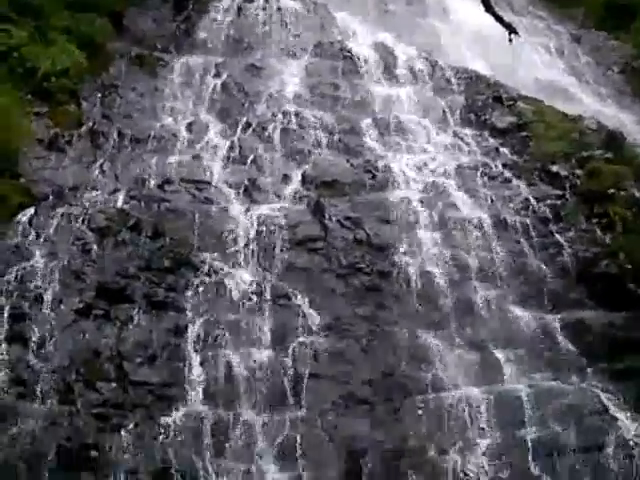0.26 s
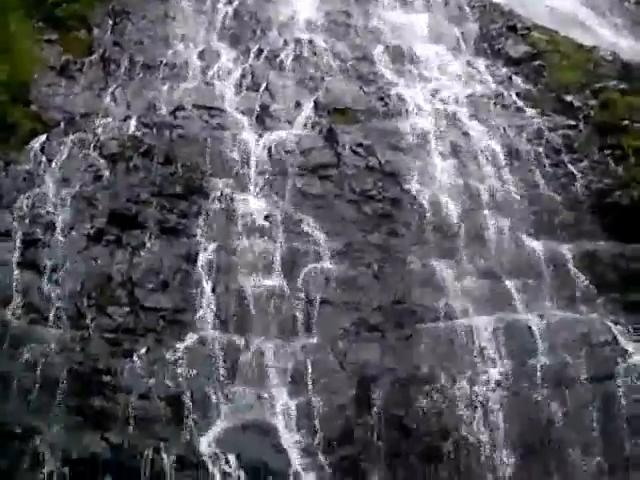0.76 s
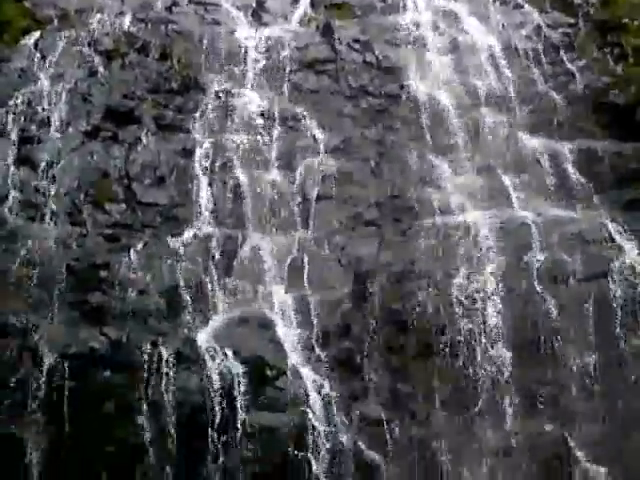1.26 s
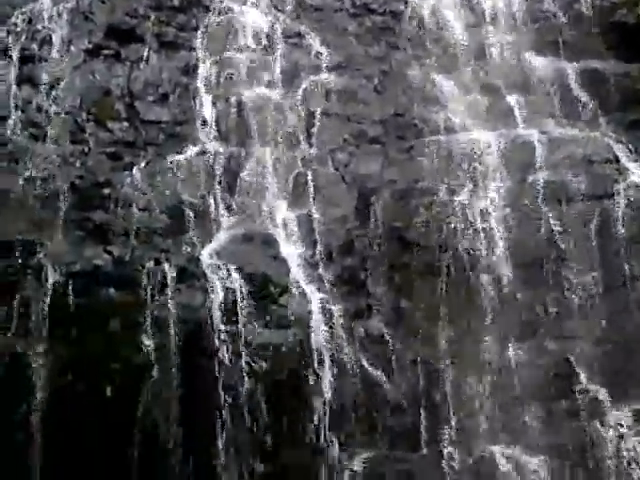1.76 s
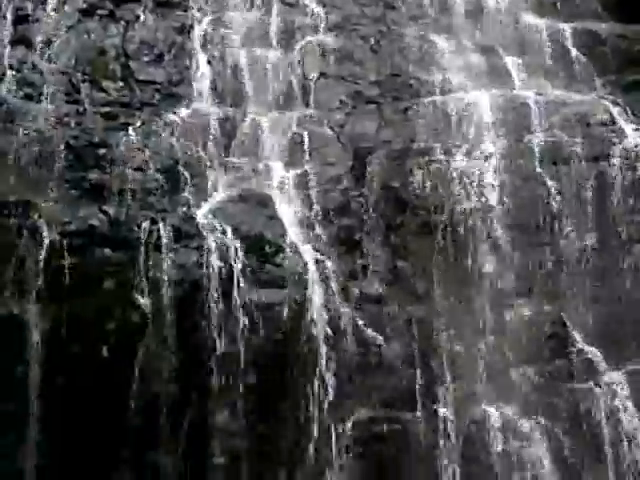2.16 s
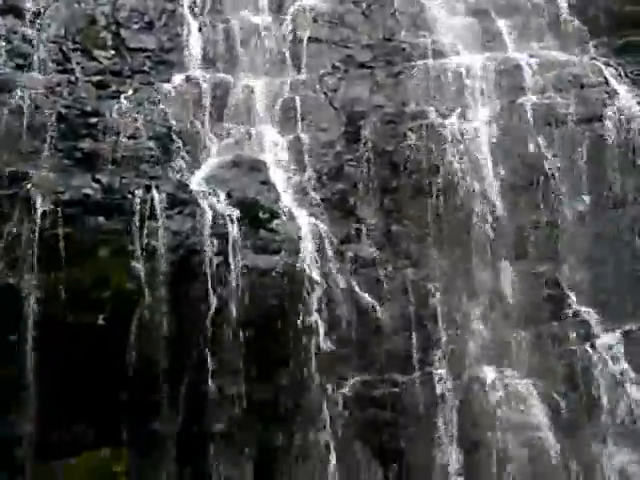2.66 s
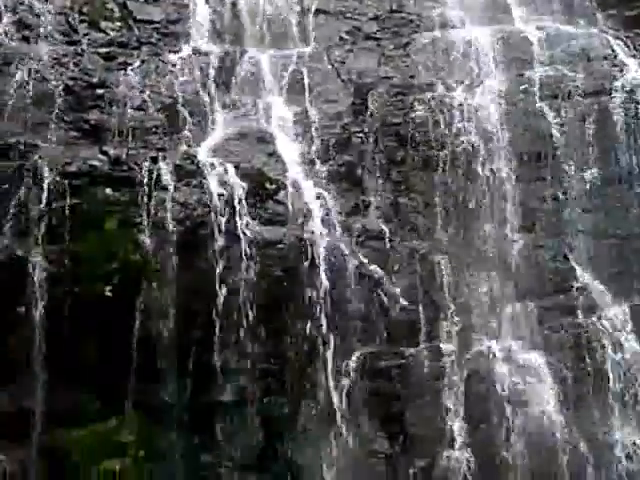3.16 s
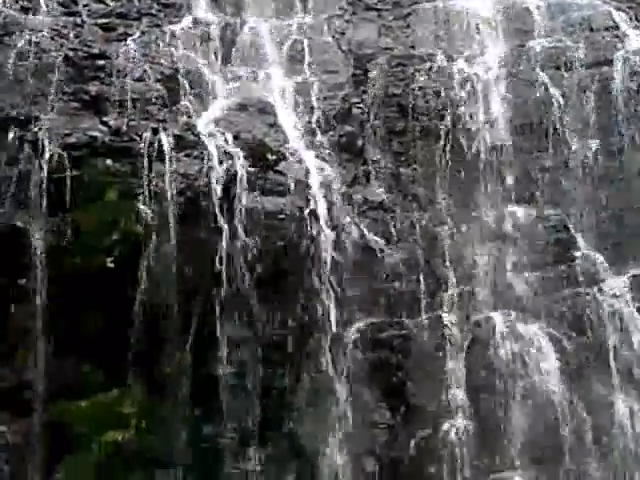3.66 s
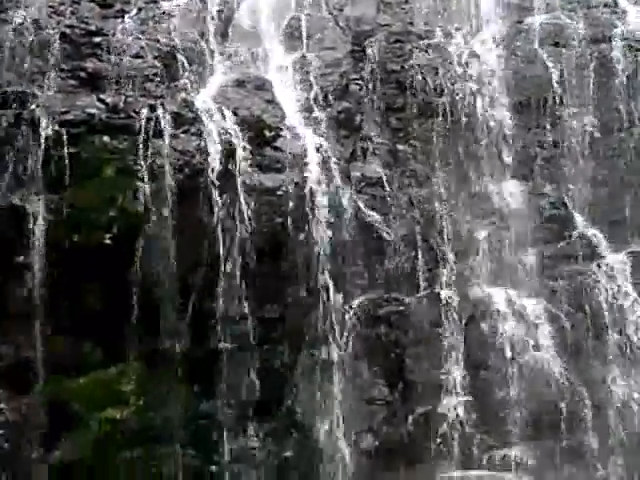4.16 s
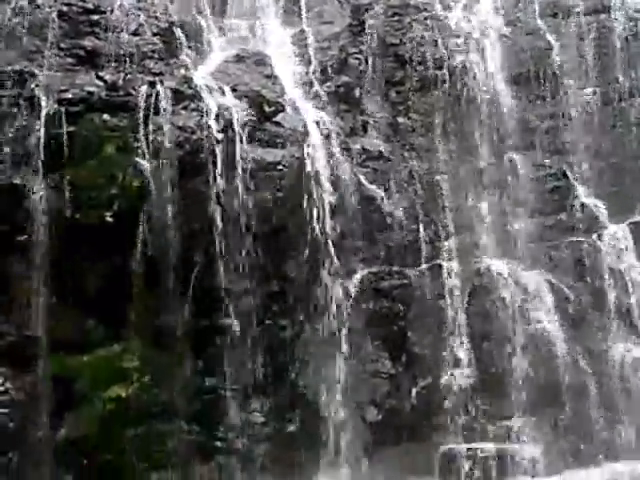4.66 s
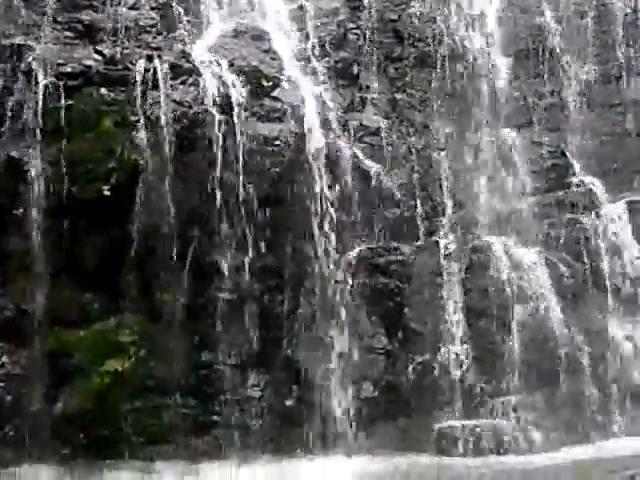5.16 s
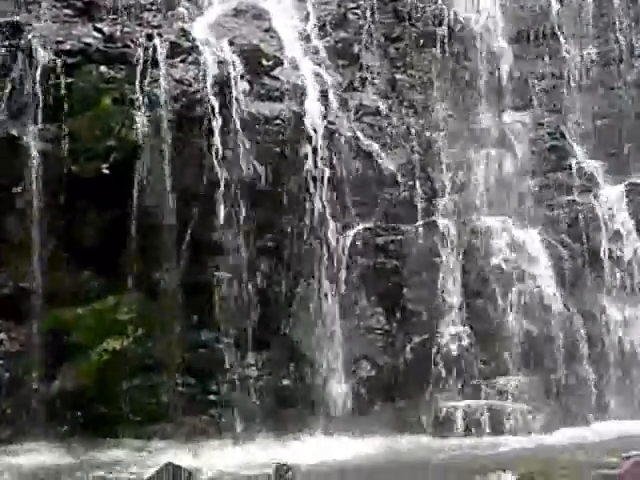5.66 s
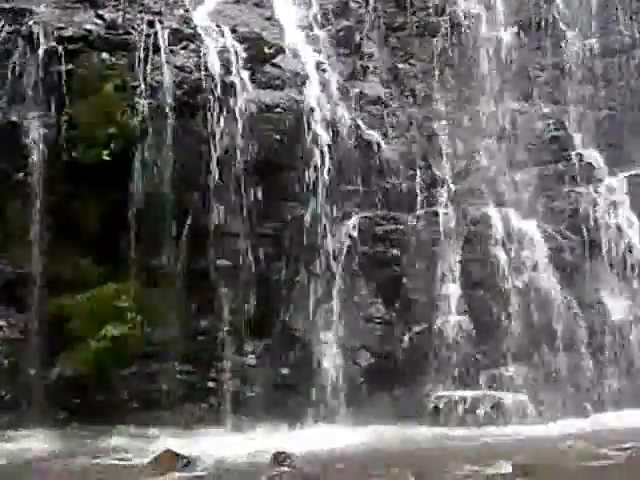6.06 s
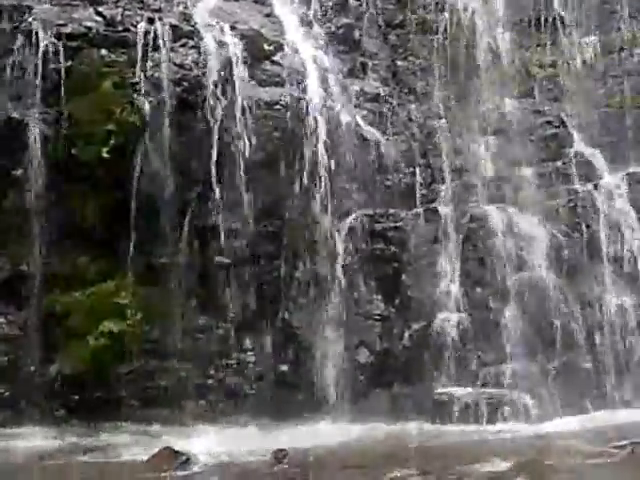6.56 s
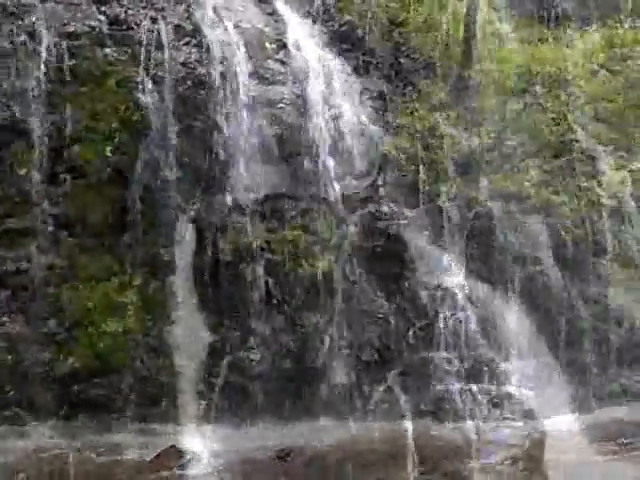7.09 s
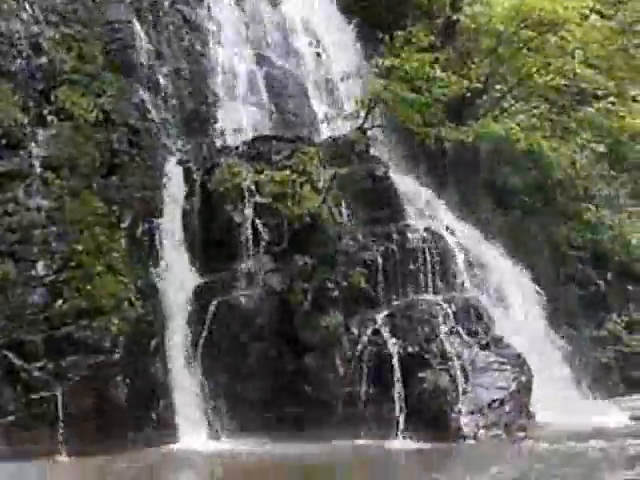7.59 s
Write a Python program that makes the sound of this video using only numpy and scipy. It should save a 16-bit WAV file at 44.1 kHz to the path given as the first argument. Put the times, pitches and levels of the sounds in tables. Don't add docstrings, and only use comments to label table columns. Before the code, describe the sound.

Constant dense roar of falling water with bright spray hiss and a fluttering low churn, thin in bass, heard from the left.

```python
import sys
import numpy as np
from scipy import signal
from scipy.fft import rfft, irfft, dct, next_fast_len
from scipy.io import wavfile
from scipy.ndimage import uniform_filter1d, minimum_filter1d, map_coordinates

SR = 44100
rng = np.random.default_rng(int(sys.argv[2]) if len(sys.argv) > 2 else 0)


def wav_out(sig):
    wavfile.write(sys.argv[1], SR, np.round(np.clip(np.atleast_2d(sig).T, -1, 1) * 32767).astype(np.int16))


def natural_amplitude(level_db):
    exponent = np.asarray(level_db, float) / 20
    return 10 ** exponent


N = 345303

# pitch_hz, level_db
RUSH_COLOUR = [(150, -13), (280, -7), (400, -4.5), (600, -4.5), (1090, -4.5), (1500, -6), (2890, -5.5),
               (4970, -3), (5700, -0.5), (6250, 1), (6750, -3.5), (7600, -3), (8200, -8.5), (9000, -40.5)]
# pitch_hz, level_db
SPRAY_COLOUR = [(6000, -40.5), (7600, -16.5), (8200, -0.5), (8800, 3.5), (9500, 1), (10600, 1), (11500, -5)]
# start_s (the middle), depth_db, length_s
POOL_LULLS = [(.26, 5, .08), (.94, 3.5, .08), (1.833, 7, .08), (2.212, 7, .09), (2.715, 9, .06),
              (2.993, 20, .09), (3.208, 9.5, .1), (3.337, 8, .07), (3.53, 4, .08), (3.82, 2.5, .13),
              (4.014, 5, .06), (4.26, 12, .11), (4.44, 5.5, .06), (4.66, 12.5, .08), (4.945, 8, .06),
              (5.06, 11, .07), (5.309, 6, .08), (5.41, 5, .05), (5.55, 7, .07), (7.097, 9, .1),
              (7.26, 6, .06), (7.403, 6.5, .05), (7.517, 20, .11), (7.662, 9, .06)]
# start_s, level_db, pitch_hz
BASS_BLIPS = [(0.031, -45, 273), (0.391, -43, 273), (0.554, -39, 172), (0.595, -38, 174),
              (0.752, -41.5, 215), (0.895, -40.5, 171), (1.17, -40, 170), (1.221, -39, 175),
              (2.008, -42, 210), (2.093, -44, 103), (2.096, -41, 150), (2.096, -47, 60), (2.097, -47, 82),
              (0.597, -57, 60), (2.181, -39.5, 214), (2.695, -42, 170), (2.999, -39, 179),
              (3.054, -34.5, 153), (3.199, -45, 274), (3.654, -40.5, 211), (4.067, -41.5, 171),
              (4.135, -42, 133), (4.435, -43, 171), (4.772, -42.5, 170), (5.385, -43.5, 208),
              (5.411, -44, 206), (5.846, -39.5, 212), (6.275, -40, 173), (6.472, -39, 136),
              (6.836, -43, 173), (7.085, -44.5, 178), (7.164, -45, 216), (7.311, -51, 213),
              (7.337, -49, 209), (7.735, -51, 212)]
# start_s, level_db
EDGE_BLIPS = [(0.325, -40), (1.199, -41), (1.415, -41.5), (1.631, -42.5), (1.699, -56), (2.201, -42),
              (3.417, -42), (3.682, -50), (3.76, -38.5), (4.383, -41.5), (5.483, -40), (5.797, -42.5),
              (5.965, -39), (6.002, -37), (6.042, -42), (6.108, -41), (6.243, -44), (6.446, -38.5),
              (6.657, -42), (7.207, -44), (7.506, -57)]
# start_s, level_db
HEM_BLIPS = [(0.196, -38.5), (0.258, -36.5), (0.34, -34), (0.402, -43), (0.508, -40), (0.567, -37),
             (0.65, -40.5), (0.675, -42), (0.762, -48), (0.949, -37), (1.08, -38), (1.148, -43),
             (1.196, -35), (1.414, -46), (1.551, -38.5), (1.629, -37), (1.708, -35), (1.923, -57),
             (2.031, -46), (2.089, -50), (2.189, -38), (2.293, -40), (2.489, -42), (2.611, -40),
             (2.735, -53), (2.793, -41), (2.828, -39), (3.073, -38), (3.209, -38), (3.462, -43),
             (3.594, -45), (3.683, -42), (3.708, -43), (3.923, -40), (4.08, -50), (4.671, -40.5),
             (4.711, -41), (5.103, -39), (5.199, -44), (5.326, -38), (5.426, -41), (5.467, -39),
             (5.51, -39), (5.613, -42), (5.714, -38), (5.772, -44), (5.802, -38), (5.859, -38),
             (6.051, -36), (6.165, -37), (6.23, -36), (6.416, -37), (6.579, -36), (6.761, -48),
             (6.865, -42), (6.968, -37), (7.201, -50), (7.39, -38), (7.595, -47), (7.69, -44)]
# start_s, length_s, level_db
NOTCH_LEAKS = [
    (.59, .04, -50),
    (2.08, .05, -53),
    (2.6, .08, -56),
    (2.83, .14, -51),
    (4.52, .06, -57),
    (5.98, .05, -55),
    (6.98, .09, -50),
    (7.68, .1, -56),
]
# pitch_hz, level_db
MICROPHONE = [(7000, 0), (7550, -1.5), (7740, -7), (7805, -32), (7895, -32), (7965, -7), (8200, -1),
              (8600, 0), (10950, 0), (11130, -6), (11170, -90)]
# start_s, level_db
LEVEL_RIDE = [
    (0.0, -22),
    (0.11, -23),
    (0.15, -21.5),
    (1.46, -22),
    (6.3, -22),
    (7.83, -21.5),
]
# pitch_hz, level_db
FAR_VIEW = [(350, -3.5), (600, -2), (1200, -2.5), (2500, -1), (5000, -0.8), (11000, -0.2)]
# pitch_hz, share
LEFT_IN_RIGHT = [(150, .4), (300, .64), (600, .64), (1200, .58), (3000, .43), (7000, .3), (11000, .12)]
# pitch_hz, level_db
RIGHT_LEVEL = [(80, -37), (170, -24.5), (300, -30.5), (2000, -28.5), (6000, -30), (7590, -29.5),
               (7660, -60), (7960, -60), (8030, -29), (11000, -28.5)]
# pitch_hz, step_db
SHORT_STEPS = [(200, -7.3), (1000, -6.4), (3000, -6.5), (6000, -6.8), (11000, -7)]
# pitch_hz, step_db
LONG_STEPS = [(60, -35), (240, -30), (450, -18.5), (2000, -14.5), (7000, -15.5), (9000, -9)]
# pitch_hz, step_db
LEFT_STEPS = [(60, -56), (200, -57), (350, -39.5), (1000, -30), (2500, -26), (6000, -29.5), (7500, -22.5),
              (7750, -48), (7950, -38), (8200, -32), (11000, -27.5), (11200, -50)]
# pitch_hz, step_db
RIGHT_STEPS = [(30, -58), (150, -54), (300, -45), (1000, -41), (3000, -37), (6000, -33), (7400, -36),
               (9000, -30), (11000, -31)]
# start_s (the middle), pitch_hz, depth_db
STARVED_BANDS = [(0.0, 3574, 13), (0.01, 3100, 10), (0.31, 2520, 9), (0.6, 2368, 10), (0.87, 3919, 9),
                 (0.91, 1920, 10), (1.03, 2067, 11), (1.21, 1400, 8), (1.47, 1421, 23), (1.54, 2240, 10),
                 (1.82, 904, 15), (1.87, 2583, 12), (1.95, 3270, 11), (2.1, 2260, 14), (2.1, 3488, 14),
                 (2.73, 2713, 10), (2.91, 3170, 10), (3.05, 1490, 12), (3.07, 2540, 11), (3.19, 3789, 11),
                 (3.29, 1960, 11), (3.49, 970, 10), (3.72, 3040, 13), (4.02, 2220, 10), (4.42, 2750, 10),
                 (4.45, 615, 12), (4.64, 2497, 17), (4.75, 1808, 7), (4.81, 2799, 15), (4.89, 3617, 12),
                 (5.39, 2153, 9), (5.49, 1765, 10), (5.56, 1981, 12), (5.9, 2080, 14), (6.08, 1937, 10),
                 (6.45, 1550, 10), (6.47, 4177, 8), (6.77, 2600, 12), (6.83, 2050, 10), (7.54, 1130, 10)]

BLIP_S = 0.029


def unit(x):
    return x / np.sqrt(np.mean(x ** 2) + 1e-20)


def along(points, hz):
    f, v = np.transpose(points)
    return np.interp(np.log(hz + 1), np.log(f + 1), v)


def wobble(rate):
    knots = rng.standard_normal(int(N * rate / SR) + 4)
    return map_coordinates(knots, [np.arange(N) * rate / SR])


def filtered(x, response):
    m = next_fast_len(N + 8192)
    hz = np.fft.rfftfreq(m, 1 / SR)
    return irfft(rfft(x, m) * response(hz), m)[..., :N]


def splashes(colour, patchy_db, drop_db, drops):
    z = signal.stft(rng.standard_normal((2, N)), nperseg=512)[2]
    patches = uniform_filter1d(rng.standard_normal(z.shape), 4, axis=1)
    patches = unit(uniform_filter1d(patches, 8, axis=2))
    bed = unit(signal.istft(z * natural_amplitude(patchy_db * patches), nperseg=512)[1][:, :N])
    strikes = (rng.random((2, N)) < drops / SR) * rng.standard_normal((2, N))
    mixed = bed + natural_amplitude(drop_db) * unit(strikes)
    return unit(filtered(mixed, lambda hz: natural_amplitude(along(colour, hz))))


def lulls():
    t = np.arange(0, N, 64) / SR
    fall_db = np.zeros(len(t))
    for middle, depth_db, length in POOL_LULLS:
        fall_db += depth_db * np.exp(-((t - middle) / (0.55 * length)) ** 4)
    return -np.interp(np.arange(N) / SR, t, fall_db)


def pool_churn(rush):
    low = filtered(rush, lambda hz: 1 / (1 + (hz / 490) ** 12))
    heaves_db, gulps_db = 0.52 * wobble(4), 1.32 * wobble(11)
    churn_db = -0.25 + heaves_db + gulps_db + lulls()
    return (natural_amplitude(churn_db) - 1) * low


def ragged_brim(rush):
    brim = filtered(rush, lambda hz: (hz > 7350) * (hz < 7850))
    ragged_db = 2 * np.minimum(wobble(14), 0.6)
    return (natural_amplitude(ragged_db) - 1) * brim


def waterfall():
    surge_db = -15.6 + 0.15 * wobble(4) + 0.3 * wobble(14) + 0.3 * wobble(40)
    rush = natural_amplitude(surge_db) * splashes(RUSH_COLOUR, patchy_db=0.99, drop_db=-13.5, drops=900)
    spray_db = surge_db + 2.5
    spray = natural_amplitude(spray_db) * splashes(SPRAY_COLOUR, patchy_db=0.5, drop_db=-13.5, drops=1500)
    return rush + pool_churn(rush) + ragged_brim(rush) + spray


def blips():
    out = np.zeros(N + SR)
    t = np.arange(round(BLIP_S * SR)) / SR
    edge = [(s, db - 0.5, 285) for s, db in EDGE_BLIPS]
    hem = [(s, db - 1, 325) for s, db in HEM_BLIPS]
    for s, db, hz in BASS_BLIPS + edge + hem:
        tone = np.sin(2 * np.pi * (hz * t + rng.random()))
        swell = np.sin(np.pi * t / BLIP_S) ** 1.5 * tone
        out[round((s - 0.004) * SR):][:len(t)] += natural_amplitude(db + 9.5) * swell
    return out[:N]


def smear(swells):
    spread_shape = np.hanning(round(0.055 * SR))
    spread = signal.fftconvolve(swells ** 2, spread_shape, mode="same") / (BLIP_S * SR)
    dull = lambda hz: hz ** 2 / (hz ** 2 + 80 ** 2) / (1 + (hz / 150) ** 4)
    rumble = filtered(rng.standard_normal(N), dull)
    return natural_amplitude(-26) * np.sqrt(np.abs(spread)) * unit(rumble)


def leaks():
    gate = np.zeros(N)
    for s, length, db in NOTCH_LEAKS:
        swell = np.hanning(round(1.5 * length * SR))
        gate[round((s - length / 4) * SR):][:len(swell)] += natural_amplitude(db - 3) * swell
    return gate * unit(filtered(rng.standard_normal(N), lambda hz: abs(hz - 7850) < 80))


def dissolve(beds, swells):
    fade_start_s, fade_s = 6.45, 1.6
    new = np.clip((np.arange(N) / SR - fade_start_s) / fade_s, 0, 1)
    old = 1 - new
    far = filtered(beds[1], lambda hz: (hz > 332) * natural_amplitude(along(FAR_VIEW, hz)))
    left = old * beds[0] + new * far + swells
    return left, old * beds[1] - new * beds[0]


def leak_to_right(left, own):
    alike = lambda hz: np.clip(along(LEFT_IN_RIGHT, hz), 0, 1)
    shares = lambda hz: natural_amplitude(along(RIGHT_LEVEL, hz)) * [alike(hz), np.sqrt(1 - alike(hz) ** 2)]
    late = np.roll(left, 1)
    return filtered(np.array([late, own]), shares).sum(axis=0)


def faint_noises():
    colours = lambda hz: [(hz / 220) ** 4 / (1 + (hz / 270) ** 10), 1 / (1 + (hz / 60) ** 4)]
    residue, hum = filtered(rng.standard_normal((2, N)), colours)
    residue_db = -71.5 + 5.2 * wobble(11) + 7.7 * wobble(7.7)
    hum_db = -79.5 + 3.3 * wobble(16) + 5 * wobble(6)
    return natural_amplitude(residue_db) * unit(residue), natural_amplitude(hum_db) * unit(hum)


def squeeze(x, steps, size, count, scatter_db, round_up, steep=False, gaps=()):
    lead = 2 * size - count % size
    padded = np.pad(x, (lead, 2 * size + (-lead - N) % size), mode="reflect")
    window = np.sin(np.pi * (np.arange(2 * size) + 0.5) / (2 * size))
    if steep:
        rise = np.cumsum(np.kaiser(size + 1, 4 * np.pi))
        window = np.sqrt(np.r_[rise[:-1], rise[-2::-1]] / rise[-1])
    blocks = np.lib.stride_tricks.sliding_window_view(padded, 2 * size)[::size] * window
    a, b, c, d = np.split(blocks, 4, axis=1)
    lines = dct(np.hstack([-c[:, ::-1] - d, a - b[:, ::-1]]), type=4, norm="ortho")
    s = (np.arange(len(lines)) * size + size - lead) / SR
    hz = (np.arange(size) + 0.5) * SR / (2 * size)
    loss_db = np.zeros(lines.shape)
    for middle_s, middle_hz, depth_db in gaps:
        in_time = np.exp(-((s - middle_s) / 0.059) ** 2)
        in_pitch = np.exp(-((hz - middle_hz) / 42) ** 2)
        loss_db += depth_db * np.outer(in_time, in_pitch)
    lines = lines * natural_amplitude(-1.5 * loss_db)
    bands = rng.standard_normal((len(lines), 64))
    scatter = np.repeat(bands, size // 64, axis=1)
    step = natural_amplitude(along(steps, hz) + scatter_db * scatter)
    kept = np.sign(lines) * step * np.floor(np.abs(lines) / step + round_up)
    p, q = np.split(dct(kept, type=4, norm="ortho"), 2, axis=1)
    back = np.hstack([q, -q[:, ::-1], -p[:, ::-1], -p]) * window
    joined = back[1:, :size] + back[:-1, size:]
    return joined.ravel()[lead - size:][:N]


def limited(x, top):
    need = np.minimum(1, top / (np.abs(x) + 1e-9))
    lowest = minimum_filter1d(need, size=301, axis=1)
    return x * uniform_filter1d(lowest, size=301, axis=1)


def scene():
    return waterfall()


def top_cut(x):
    return signal.sosfilt(signal.butter(12, 12240, fs=SR, output="sos"), x)


def record(dry):
    microphone = lambda hz: natural_amplitude(along(MICROPHONE, hz)) * [hz > 332, hz > 0]
    beds = [squeeze(x, SHORT_STEPS, size=576, count=100, scatter_db=1.4, round_up=0.42)
            for x in filtered(dry, microphone)]
    s, ride_db = np.transpose(LEVEL_RIDE)
    ride = natural_amplitude(np.interp(np.arange(N) / SR, s, ride_db) + 22)
    swells = blips() / ride
    left, own = dissolve(beds, swells)
    right = leak_to_right(left, own)
    left = squeeze(left, LONG_STEPS, size=2048, count=1966, scatter_db=2.0, round_up=0.45)
    residue, hum = faint_noises()
    deep_swells = filtered(swells, lambda hz: hz < 240)
    left = left + residue + smear(deep_swells) + leaks() / ride
    right = right + hum
    both = limited(ride * np.array([left, right]), top=0.97)
    left, right = filtered(both, lambda hz: np.array([hz < 11210, hz < 11150]))
    left = squeeze(left, LEFT_STEPS, size=1024, count=366, scatter_db=2.5, round_up=0.4,
                   steep=True, gaps=STARVED_BANDS)
    right = squeeze(right, RIGHT_STEPS, size=1024, count=366, scatter_db=2.2, round_up=0.4, steep=True)
    return top_cut(np.array([left, right]))


dry = scene()
out = record(dry)
wav_out(out)
```